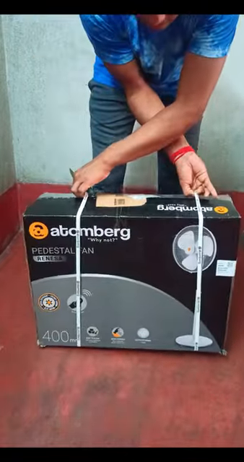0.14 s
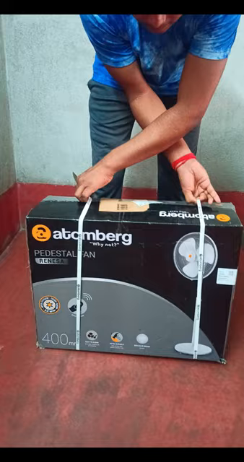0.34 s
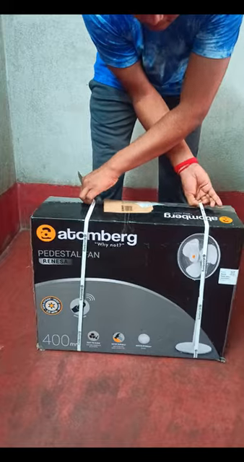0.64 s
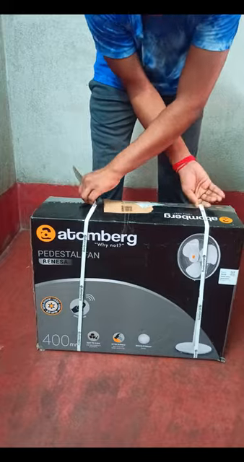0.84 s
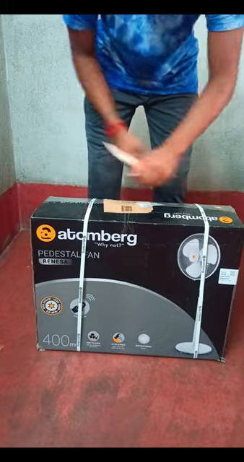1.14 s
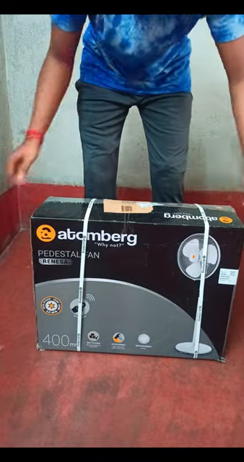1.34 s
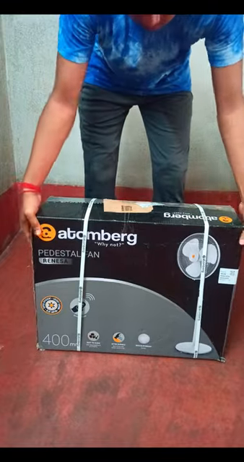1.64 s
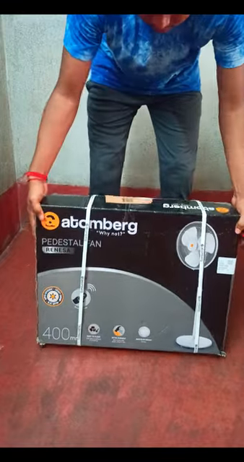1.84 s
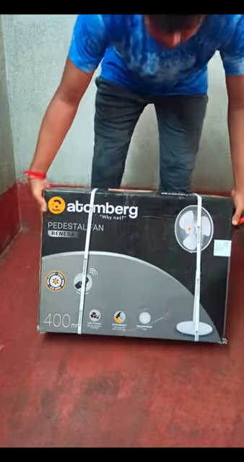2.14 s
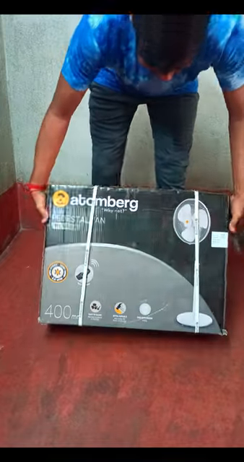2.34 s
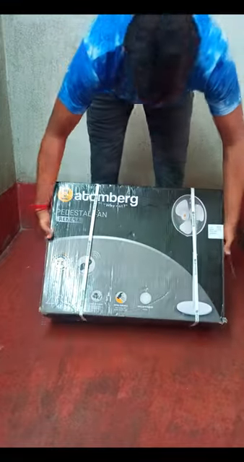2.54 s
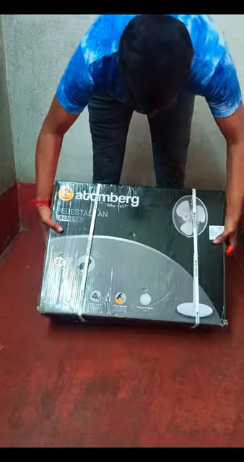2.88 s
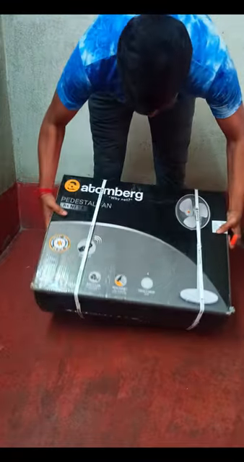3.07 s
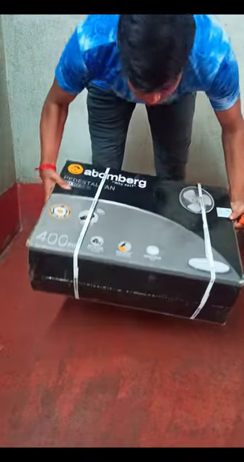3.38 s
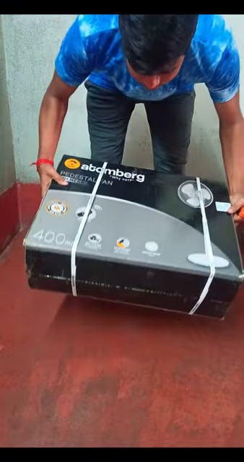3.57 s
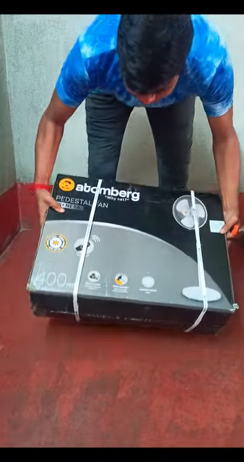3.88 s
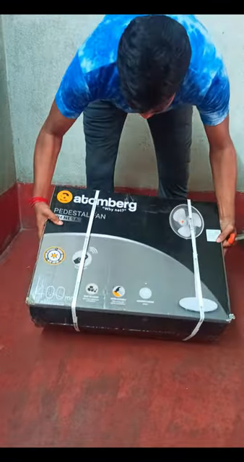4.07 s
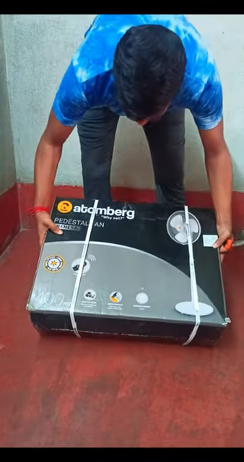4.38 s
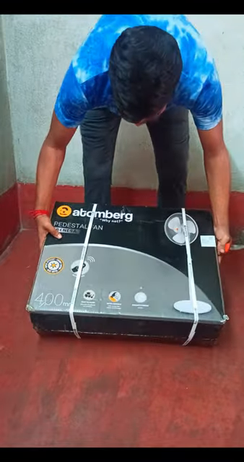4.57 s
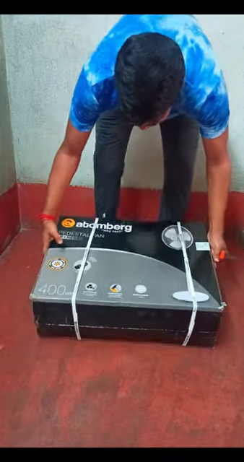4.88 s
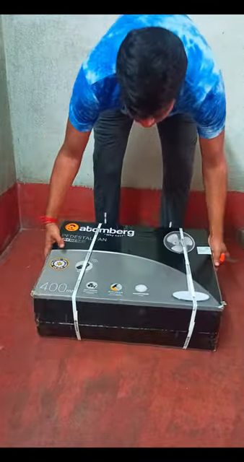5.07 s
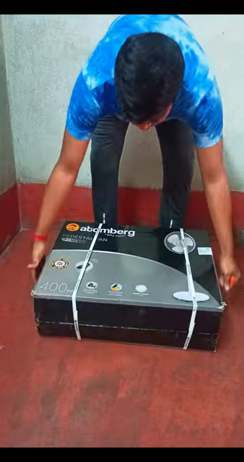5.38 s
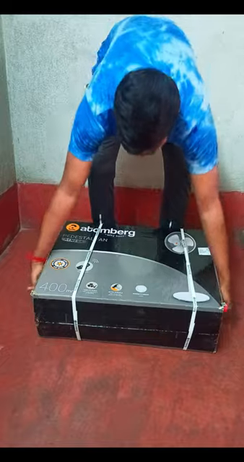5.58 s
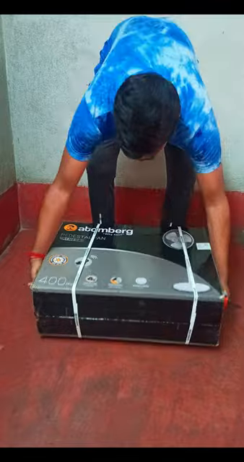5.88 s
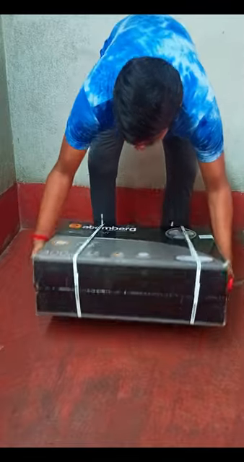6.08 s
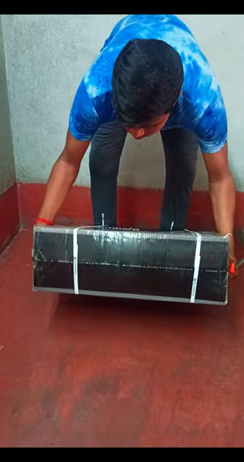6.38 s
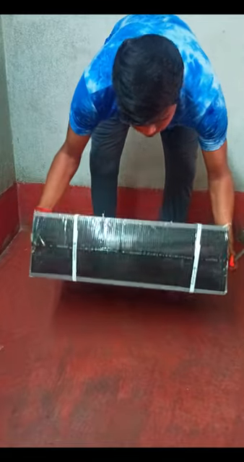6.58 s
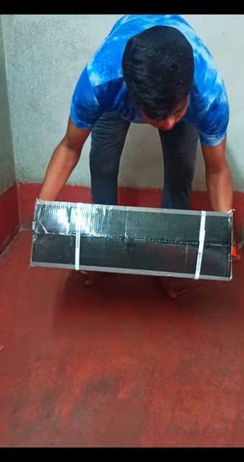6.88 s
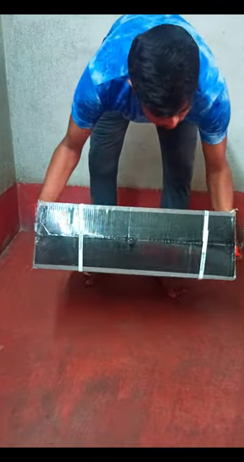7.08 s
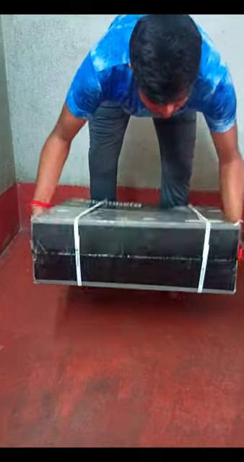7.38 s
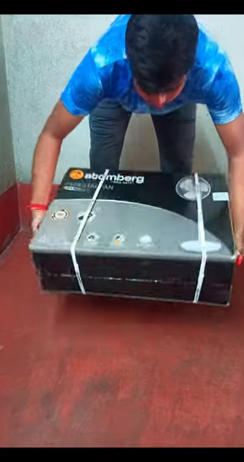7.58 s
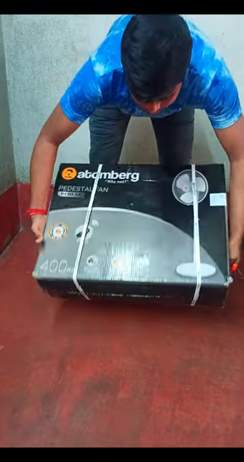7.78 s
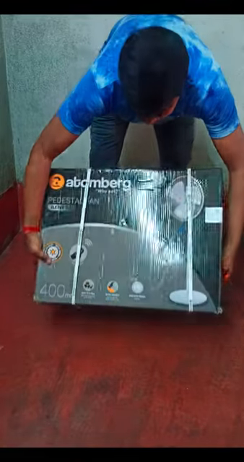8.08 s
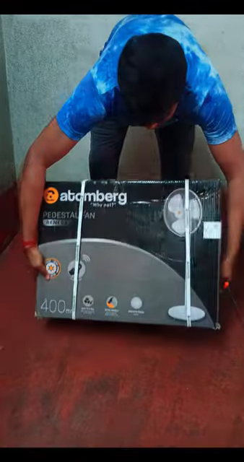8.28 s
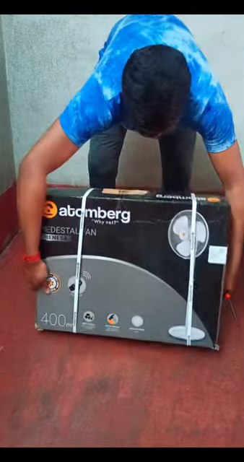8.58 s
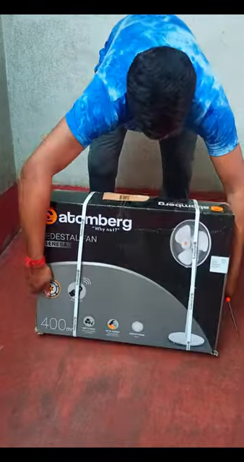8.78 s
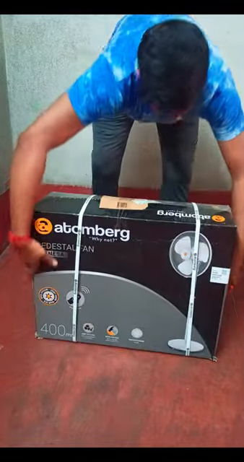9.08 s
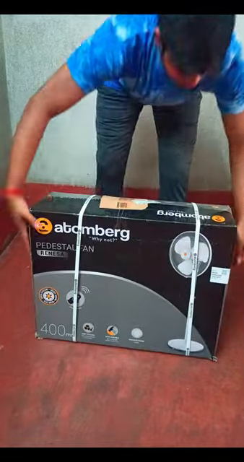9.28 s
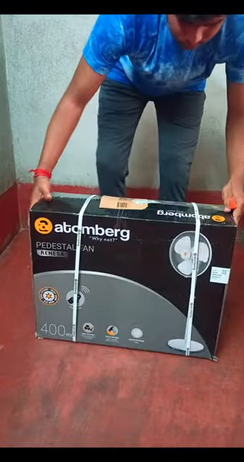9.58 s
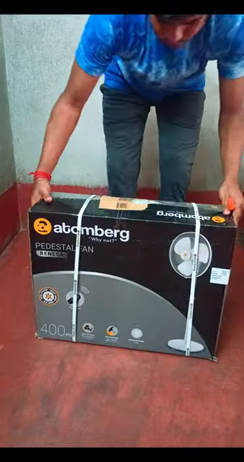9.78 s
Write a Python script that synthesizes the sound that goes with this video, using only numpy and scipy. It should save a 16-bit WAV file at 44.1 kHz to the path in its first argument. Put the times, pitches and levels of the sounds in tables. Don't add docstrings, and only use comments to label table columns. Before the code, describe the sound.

A close mono phone microphone in a small bare room with short hard reverberation and almost silent background. From 0 to 1.1 s, hands rustle and rasp on a strapped cardboard carton, with small tape crackles and light hollow knocks, strongest near 0.5 s. A quiet gap follows. At 1.75 s blows and scraping begin; very sharp dry strap snaps crack at 1.94 and 2.07 s, then a brisk palm hiss at 2.2 s. At 2.6 s the carton lands with a heavy double thump. Softer scrapes and ticks thin out until 4 s. A booming drop with clicks hits at 4.56 s, followed by sliding and knocks to 5.2 s. A third thump at 5.7 s brings bright tape crackle. From 6.2 to 8 s only faint ticks and nudges; then strap clicks, rustling at 8.9 s, and stronger rubbing, peels and knocks to the end near 10 s.

```python
import sys
import numpy as np
from scipy import signal
from scipy.fft import rfft, irfft, next_fast_len
from scipy.io import wavfile
from scipy.ndimage import uniform_filter1d

SR = 44100
rng = np.random.default_rng(int(sys.argv[2]) if len(sys.argv) > 2 else 0)


def generate_wav(sig):
    pcm = np.round(np.clip(np.atleast_2d(sig).T, -1, 1) * 32767).astype(np.int16)
    wavfile.write(sys.argv[1], SR, pcm)


def decibels_to_gain(level_db):
    exponent = np.asarray(level_db, float) / 20
    return 10 ** exponent


N = 437913

# f/Hz, level/dB, t60/s
PANEL_MODES = [(205, -12, 0.58), (231, 1.5, 0.3), (314, 1.5, 0.049), (366, -6, 0.18), (441, 1, 0.33),
               (542, -2.5, 0.52), (633, -3.5, 0.29), (738, -6.5, 0.35), (881, -15.5, 5.0), (925, -28, 1.3),
               (990, -27, 0.52), (1080, -29.5, 0.31), (1275, -11.5, 1.9), (1460, -24, 0.2),
               (1530, -53, 5.0), (1610, -35, 0.53), (1786, -44.5, 1.4)]
# f/Hz, level/dB, t60/s
CARTON_AIR_MODES = [(102, -9, 0.8), (116.34, -1.5, 0.47), (126, -11.5, 0.35), (142.2, -10.5, 0.73),
                    (176.7, -11.5, 0.3)]
# f/Hz, level/dB per Hz
HISS_SPECTRUM = [(2060, -12.5), (3500, -3), (3660, -4), (4340, -4.5), (5090, 0.5), (6570, 0.5), (7230, 3),
                 (8360, -1), (10700, -12.5), (13400, -5), (15100, -6.5), (16000, -22.5)]


def unit(x):
    return x / np.sqrt(np.mean(x ** 2))


def colour(x, points):
    hz, db = np.transpose(points)
    size = next_fast_len(len(x))
    f = np.maximum(np.arange(size // 2 + 1) * SR / size, 1)
    gain = decibels_to_gain(np.interp(np.log(f), np.log(hz), db))
    return irfft(rfft(x, size) * gain, size)[:len(x)]


def walk(rate):
    hold = int(SR / rate)
    levels = rng.standard_normal(N // hold + 1)
    return uniform_filter1d(np.repeat(levels, hold)[:N], hold)


def add(track, s, sound):
    i = int(s * SR)
    track[i:i + len(sound)] += sound[:N - i]


def ring(x, hz, t60):
    r = np.exp(-np.log(1000) / (t60 * SR))
    y = signal.lfilter([1], [1, -2 * r * np.cos(2 * np.pi * hz / SR), r * r], x)
    return y * 2 * np.sin(2 * np.pi * hz / SR) * np.sqrt(1 - r)


def struck(modes, weights, t, last):
    hz, db, t60 = np.transpose(modes)[:, :, None]
    size, shift = rng.standard_normal((2, len(modes), 1))
    fade_db = -60 * t / (np.minimum(t60, 1.5) * last)
    tones = np.sin(2 * np.pi * hz * (1 + .015 * shift) * t)
    return np.sum(weights * decibels_to_gain(db + 1.5 * size + fade_db) * tones, axis=0)


def room(x, wet_db):
    t60_s, first_bounce_s = 0.47, .004
    t = np.arange(SR // 2) / SR
    tail = colour(rng.standard_normal(len(t)), [(100, -20), (200, 0)])
    tail = tail * decibels_to_gain(-60 * t / t60_s) * (t > first_bounce_s)
    tail = tail / np.sqrt(np.sum(tail ** 2))
    return x + decibels_to_gain(wet_db) * signal.fftconvolve(x, tail)[:N]


def room_air():
    # f/Hz, level/dB per Hz
    air_spectrum = [(18, -43.5), (30, -12), (95, 3), (204, -4.5), (273, 6.5), (540, -8), (600, -3),
                    (1190, -14), (2900, -18.5), (9460, -34.5), (16000, -21)]
    return unit(colour(rng.standard_normal(N), air_spectrum)) * decibels_to_gain(-76.5 + 1.5 * walk(6))


def booms():
    # t/s, level/dB, t60/s
    wakings = [
        (1.759, -37.5, 2.2),
        (2.63, -26, 1.1),
        (4.569, -34, 1.1),
        (5.717, -31, 1.33),
        (8.2, -60, 1.3),
        (8.7, -47, 3.1),
        (9.701, -37, 0.79),
    ]
    mode_hz, swell_s = 75.5, 0.19
    out, t = np.zeros(N), np.arange(SR) / SR
    for s, db, t60 in wakings:
        envelope = decibels_to_gain(db - 60 * t / t60) * (1 - np.exp(-t / swell_s)) * (1 - t)
        add(out, s, envelope * np.sin(2 * np.pi * mode_hz * t))
    return out


def strokes(rows):
    drop_db, bend = 20, 1.5
    t = np.arange(0, N + 64, 64) / SR
    s, db, rise, fall = np.transpose(rows)[:, :, None]
    away = np.where(t < s, (s - t) / np.maximum(rise, .005), (t - s) / fall)
    power = np.sum(decibels_to_gain(db - drop_db * away ** bend) ** 2, axis=0)
    return np.interp(np.arange(N) / SR, t, power)


def grit(per_s, scatter_db, smooth):
    chance = rng.random((3, N))
    size_db = scatter_db * np.minimum(-np.log(1 - chance[2]), 4)
    catches = (chance[0] < per_s / SR) * np.sign(chance[1] - .5) * decibels_to_gain(size_db)
    return unit(catches) + smooth * rng.standard_normal(N)


def patchy(x, patch_db, rate):
    size = next_fast_len(N)
    bins = rfft(x, size)
    f = np.maximum(np.arange(size // 2 + 1) * SR / size, 1)
    place = 3 * np.log2(f / 700)
    out = np.zeros(N)
    for k in range(15):
        band = irfft(bins * np.maximum(1 - abs(place - k), 0), size)[:N]
        out += decibels_to_gain(patch_db * walk(rate)) * band
    return unit(out)


def grit_hiss(palms, scrapes, judder_db):
    rub = palms + scrapes
    hiss = patchy(colour(grit(1500, 2.6, 1.3), HISS_SPECTRUM), 0.53, 60)
    hiss = hiss * decibels_to_gain(judder_db - 0.5) * np.sqrt(rub)
    top = signal.sosfilt(signal.butter(2, 9000, "high", fs=SR, output="sos"), hiss)
    palm_sheen_db, scrape_sheen_db, sheen_per_db = 2, 0, 0.06
    sheen_db = (palms * palm_sheen_db + scrapes * scrape_sheen_db) / rub
    pressure = (rub / decibels_to_gain(-48) ** 2) ** (sheen_per_db / 2)
    return hiss + top * (decibels_to_gain(sheen_db) * pressure - 1)


def card_rasp(palms, scrapes, judder_db):
    # f/Hz, level/dB per Hz
    rasp_spectrum = [(470, 2), (800, -2), (1240, -7), (1570, -3.5), (1710, 0.5), (1840, -1), (2330, -6.5),
                     (2490, -4), (3780, -6), (4500, -11), (5850, -33), (9900, -120)]
    # f/Hz, width/Hz, level/dB
    flute_modes = [(1658, 98, -0.5), (2476, 33, -8.5), (3570, 220, -4), (6960, 130, 4.5)]
    catches = grit(2000, 2, 1.5)
    palm_db, scrape_db = -6.5, -1
    bite = np.sqrt(palms * decibels_to_gain(palm_db) ** 2 + scrapes * decibels_to_gain(scrape_db) ** 2)
    rasp = patchy(colour(catches, rasp_spectrum), 1.8, 50)
    flutes = unit(sum(decibels_to_gain(db) * ring(catches, hz, 2.6 / width) for hz, width, db in flute_modes))
    return (decibels_to_gain(-3.0) * rasp + decibels_to_gain(-13) * flutes) * decibels_to_gain(judder_db) * bite


def shaken_carton(judder_db):
    # peak t/s, level/dB, rise/s, fall/s
    drags = [(0.207, -52, 0.05, 0.13), (0.482, -60.5, 0.7, 0.046), (0.517, -52.5, 0.22, 0.2),
             (0.61, -45, 0.16, 0.13), (0.951, -54, 0.15, 0.19), (1.043, -51.5, 0.11, 0.15),
             (1.743, -41.5, 0.02, 0.39), (9.299, -48.5, 0.006, 0.12), (6.35, -55.5, 0.085, 0.14),
             (6.1, -50, 0.04, 0.12), (1.958, -41, 0.04, 0.23), (2.229, -47, 0.15, 0.31),
             (2.637, -45, 0.32, 0.57), (3.32, -55.5, 0.13, 0.24), (3.635, -64, 0.023, 0.72),
             (3.89, -59.5, 0.08, 0.13), (4.322, -46, 0.0091, 0.3), (4.572, -49, 0.029, 0.23),
             (4.701, -52, 0.31, 0.17), (5.106, -41.5, 0.41, 0.22), (5.782, -47, 0.39, 0.19),
             (5.862, -42.5, 0.1, 0.13), (6.021, -54.5, 0.067, 0.58), (6.025, -45, 0.041, 0.14),
             (6.812, -63.5, 0.32, 0.74), (7.807, -52, 0.27, 0.46), (8.074, -52, 0.46, 0.95),
             (8.792, -49.5, 0.32, 0.22), (9.328, -51.5, 1, 0.23), (9.6, -51.5, 0.019, 0.41),
             (9.972, -41.5, 0.35, 0.015)]
    # peak t/s, level/dB, rise/s, fall/s
    heaves = [(0.498, -55.5, 0.7, 0.67), (1.779, -48, 0.11, 0.7), (2.644, -49.5, 0.79, 1),
              (3.614, -57.5, 0.044, 0.21), (3.87, -66, 0.322, 0.48), (3.902, -60, 0.13, 0.15),
              (4.316, -36.5, 0.0061, 0.96), (4.68, -33, 0.29, 0.077), (5.201, -43, 0.3, 0.21),
              (5.714, -43, 0.21, 0.47), (8.021, -59, 0.79, 0.36), (8.228, -44.5, 0.029, 0.26),
              (8.419, -52.5, 0.28, 0.46), (9.394, -55, 0.55, 0.15), (9.784, -47, 0.25, 0.073),
              (9.814, -43, 0.012, 0.13),
              (0.05, -49, 0.018, 0.13),
        (0.96, -55, .05, .15),
        (2.68, -41, 0.047, 0.2),
        (5.57, -47, 0.074, .1),
        (7.371, -67, .03, 0.11),
        (7.75, -71, 0.055, .1),
        (8.76, -63, .04, 0.088),
        (9.31, -50, .015, 0.08),
    ]
    # f/Hz, level/dB, t60/s
    room_modes = [(82, -22.5, 7.6), (55, -34, 0.56)]
    shake = grit(600, 2.0, 1.0) * decibels_to_gain(judder_db)
    panels = unit(sum(decibels_to_gain(2.25 * db) * ring(shake, hz, 0.017) for hz, db, _ in PANEL_MODES))
    air_modes = CARTON_AIR_MODES + room_modes
    boom = unit(sum(decibels_to_gain(db) * ring(shake, hz, 2.1 * t60) for hz, db, t60 in air_modes))
    panels = panels * decibels_to_gain(-1.0) * np.sqrt(strokes(drags))
    return panels + boom * decibels_to_gain(-4.5) * np.sqrt(strokes(heaves))


def rubbing():
    # peak t/s, level/dB, rise/s, fall/s
    palm_strokes = [(0.397, -43, 0.016, 0.23), (0.77, -62, 0.01, 0.28), (2.209, -44, 0.39, 0.29),
                    (2.223, -34.5, 0.018, 0.11), (2.642, -38.5, 0.3, 0.22), (4.077, -77, 0.26, 0.076),
                    (4.586, -41, 0.088, 0.27), (4.664, -39.5, 0.1, 0.066), (4.945, -38, 0.096, 0.19),
                    (5.043, -46.5, 0.15, 0.18), (5.619, -53, 0.12, 0.64), (5.943, -50.5, 0.55, 0.016),
                    (6.028, -43, 0.025, 0.18), (6.41, -56.5, 0.34, 0.084), (6.619, -66.5, 0.019, 0.17),
                    (6.932, -66.5, 0.35, 0.29), (7.377, -70.5, 0.17, 0.15), (7.796, -50.5, 0.15, 0.36),
                    (8.015, -50, 0.11, 0.072), (8.5, -53.5, 0.0085, 0.24), (9.195, -47, 0.36, 0.11),
                    (8.921, -47, 0.0052, 0.52), (9.385, -54, 0.098, 0.17), (9.749, -43.5, 0.096, 0.17),
                    (9.897, -39, 0.029, 0.25)]
    # peak t/s, level/dB, rise/s, fall/s
    scrape_strokes = [(0.078, -76, 0.066, 0.15), (0.223, -50.5, 0.042, 0.11), (0.566, -40.0, 0.057, 0.14),
                      (0.943, -56.5, 0.021, 0.074), (1.045, -61, 0.096, 0.12), (1.792, -50, 0.012, 0.062),
                      (1.742, -57.5, 0.0045, 1.0), (4.509, -51.5, 0.005, 0.067),
                      (0.543, -46.5, 0.0066, 0.041), (7.805, -65, 0.006, 0.07), (6.34, -59, 0.07, 0.08),
                      (1.943, -36.5, 0.013, 0.14), (2.072, -38.5, 0.0068, 0.09), (2.959, -46.5, 0.4, 0.11),
                      (3.045, -49.5, 0.22, 0.07), (3.246, -54.5, 0.0063, 0.17), (3.382, -58.5, 0.46, 0.12),
                      (3.595, -69, 0.0078, 0.38), (3.892, -56, 0.056, 0.089), (4.329, -62.5, 0.023, 0.84),
                      (5.11, -46, 0.057, 0.12), (5.324, -65, 0.99, 0.055), (5.686, -52.5, 0.032, 0.13),
                      (5.845, -38, 0.027, 0.15), (8.327, -55.5, 0.74, 0.242), (8.791, -52.5, 0.31, 0.17),
                      (8.923, -50.5, 0.0076, 0.23), (9.606, -61.5, 0.081, 0.1)]
    hush_db = -92
    palms = strokes(palm_strokes) + decibels_to_gain(hush_db) ** 2
    scrapes = strokes(scrape_strokes)
    judder_db = 1.38 * walk(40) + 0.66 * walk(150)
    hiss = grit_hiss(palms, scrapes, judder_db)
    return hiss + card_rasp(palms, scrapes, judder_db) + shaken_carton(judder_db)


def ticks(rows, tail_db, t60):
    out, t = np.zeros(N), np.arange(SR // 2) / SR
    release_s, strap_t60_s, strap_share = .0007, 0.015, 0.35
    jolt = 2.5 * (np.arange(len(t)) == int(release_s * SR))
    for s, db, hz in rows:
        noise = rng.standard_normal((2, len(t)))
        shape = [(.25 * hz, -22), (.6 * hz, -5), (hz, 0), (min(1.45 * hz, 9000), -7),
                 (10600, -23), (13500, -14), (16000, -16)]
        crack = colour(jolt + noise[0] * np.exp(-t / .0014) * (t > release_s), shape)
        ping = np.sin(2 * np.pi * hz * t) * decibels_to_gain(-60 * t / strap_t60_s) * (t > .0005)
        crack = crack / np.abs(crack).max() + strap_share * ping
        crack = crack + .4 * np.roll(crack, int(.0025 * SR))
        crack = crack / np.abs(crack).max()
        rustle = unit(unit(colour(noise[1], HISS_SPECTRUM)) + 0.3 * unit(colour(noise[1], shape)))
        add(out, s - .0005, decibels_to_gain(db) * (crack + decibels_to_gain(tail_db - 60 * t / t60) * rustle))
    return out


def flicks():
    # t/s, peak level/dB, centre f/Hz
    flick_events = [(0.0697, -61, 2440), (0.4055, -30, 2200), (0.8689, -48, 4820), (1.7394, -50, 1620),
                    (1.952, -22, 2000), (3.1438, -42, 3040), (3.1792, -43, 7000), (3.8417, -47, 1610),
                    (4.0272, -60, 4960), (4.562, -27, 3120), (4.573, -23, 4200), (4.525, -42, 2000),
                    (5.905, -29, 3800), (6.06, -40, 3260), (6.085, -35, 2500), (7.0951, -57, 3530),
                    (7.3305, -55, 3950), (7.378, -57, 6600), (8.9224, -32, 4800), (8.975, -35, 5000),
                    (9.323, -50, 2800), (9.4772, -52, 6410), (9.5929, -46, 1760)]
    return room(ticks(flick_events, -31, 0.2), -1.5)


def straps_and_tape():
    # t/s, peak level/dB, centre f/Hz
    snaps = [(0.2134, -45, 4970), (1.8816, -30, 2590), (1.925, -24, 4690), (1.9326, -25, 3500),
             (1.9399, -13.5, 4180), (2.0677, -16, 3570), (2.219, -22, 7300), (2.963, -35, 3000),
             (3.2337, -57, 6100), (4.074, -55.5, 6120), (4.4787, -38.5, 3020), (4.5446, -21.5, 3060),
             (4.5645, -20.5, 6900), (5.8302, -24, 3600), (6.2942, -39, 5840), (6.3548, -41, 5030),
             (6.3994, -38, 5480), (6.605, -55, 4040), (6.6223, -45, 7300), (7.3696, -55, 7100),
             (7.4734, -53.5, 3080), (7.5088, -52, 2500), (8.325, -30, 3460), (8.504, -30.5, 4970),
             (8.7305, -33, 5000), (8.7849, -30.5, 4960)]
    # t/s, peak level/dB, centre f/Hz
    peels = [(0.179, -49, 5750), (0.2683, -33.5, 3300), (0.374, -31, 3530), (0.4044, -49, 7470),
             (0.4434, -49, 6630), (0.547, -24, 2330), (0.9388, -54, 6510), (1.7888, -36, 5270),
             (3.245, -40, 6600), (3.5967, -63, 6600), (3.8676, -44.5, 3330), (3.8876, -42.5, 3340),
             (4.5065, -34, 1790), (5.8421, -20, 6960), (5.8665, -21.5, 4950), (6.008, -27.5, 3580),
             (6.2745, -57, 7060), (5.56, -44.5, 7540), (8.9172, -32, 3800), (8.946, -30, 3300),
             (9.0395, -26.5, 3630), (9.7016, -33, 5100), (9.7404, -23, 4140), (9.8876, -24.5, 6160)]
    return room(ticks(snaps, -38.5, 0.31) + ticks(peels, -22.5, 0.32), -2.0)


def blows(rows, knock_db, last):
    # f/Hz, level/dB
    knock_spectrum = [(300, -34.5), (550, 6), (900, -1), (1300, -9.5), (1750, -9.5), (2300, -27),
                      (5000, -42.5)]
    out, t = np.zeros(N), np.arange(SR // 2) / SR
    panels = np.minimum(np.array(PANEL_MODES) * [1, .6, 1], [SR, 20, .22])
    sign = (-1.) ** np.arange(len(panels))[:, None]
    for s, db, centre_hz, thud_db in rows:
        octaves = np.log2(panels[:, :1] / centre_hz)
        near = np.exp(-.5 * (octaves / 0.51) ** 2) + 0.1
        body = struck(panels, sign * near, t, last) + struck([(centre_hz, 3, .13)], 1.0, t, last)
        body = body / np.abs(body).max()
        thud = struck(CARTON_AIR_MODES, decibels_to_gain(thud_db), t, last)
        knock = unit(colour(rng.standard_normal(len(t)), knock_spectrum))
        knock = knock * decibels_to_gain(knock_db - 60 * t / (0.23 * last))
        push = np.minimum(t / 0.0014, 1)
        add(out, s, decibels_to_gain(db - 1.5) * push * (body + thud + knock))
    return out


def taps():
    # t/s, peak level/dB, strongest ring f/Hz, thud re peak level/dB
    tap_events = [
        (0.393, -47, 240, -2),
        (0.866, -57, 186, -10),
        (5.324, -52, 220, -1),
        (6.08, -41, 300, -16),
        (6.275, -51.5, 250, -14),
        (7.47, -59.5, 227, -3),
        (8.684, -46, 223, -15),
        (9.755, -41.5, 197, -8),
        (9.41, -50, 250, -3),
    ]
    return room(blows(tap_events, -12, 0.65), -2.9)


def panel_hits():
    # t/s, peak level/dB, strongest ring f/Hz, thud re peak level/dB
    blow_events = [(0.033, -48.5, 226, -3), (0.194, -44, 890, -23), (0.213, -39, 844, -17),
                   (0.442, -36.5, 250, -21), (0.548, -38, 572, -9), (0.936, -39, 232, -30),
                   (1.738, -31.5, 320, -19), (1.79, -30.5, 366, -5.5), (1.942, -31, 407, -12),
                   (2.218, -34.5, 184, -9), (2.67, -32, 347, -2), (3.606, -49, 231, -18),
                   (3.845, -50, 257, -12.5), (4.317, -36.5, 272, 0), (4.63, -34, 241, -17),
                   (4.951, -35.5, 302, -10), (5.03, -30, 282, -7), (5.169, -38, 231, -17),
                   (5.509, -48, 208, -11), (5.79, -31.5, 400, -1), (6.009, -41, 205, -11),
                   (7.349, -60.5, 275, 1), (7.664, -53, 366, -18), (7.719, -43.5, 335, -8),
                   (8.05, -46, 266, -20), (8.355, -44, 198, -4), (8.513, -44.5, 713, -3),
                   (9.297, -41, 337, -0.5), (9.593, -35, 300, -27), (9.89, -40.5, 573, -18)]
    # t/s, peak level/dB, strongest ring f/Hz, thud re peak level/dB
    slams = [
        (2.577, -18, 251, -26),
        (2.6, -19.5, 441, -18.5),
        (4.56, -22, 265, 1.5),
        (5.692, -18.5, 350, -12),
        (5.705, -23.5, 295, -8),
    ]
    return room(blows(blow_events, -14.5, 0.71) + blows(slams, -12.5, 0.52), -1.5)


def scene():
    mono = room_air() + booms() + rubbing()
    mono = mono + flicks() + straps_and_tape() + taps() + panel_hits()
    return np.array([mono, mono])


def low_pass(x):
    return signal.sosfilt(signal.butter(12, 16660, fs=SR, output="sos"), x)


def record(dry):
    x = signal.sosfilt(signal.butter(4, 58, "high", fs=SR, output="sos"), dry)
    x = signal.sosfilt(signal.ellip(8, .2, 70, 15900, fs=SR, output="sos"), x)
    return low_pass(x)


dry = scene()
out = record(dry)
generate_wav(out)
```